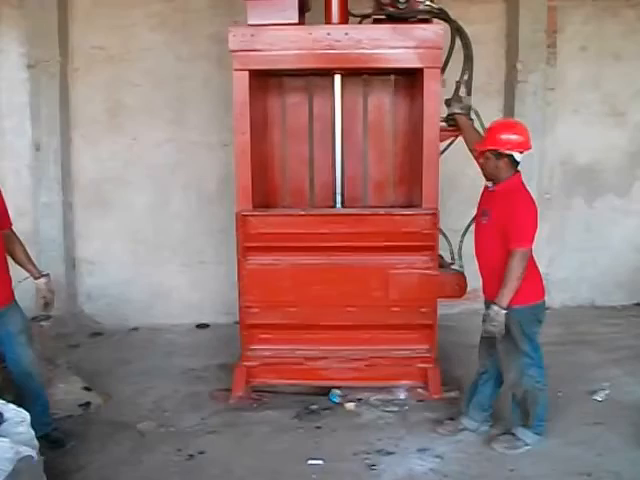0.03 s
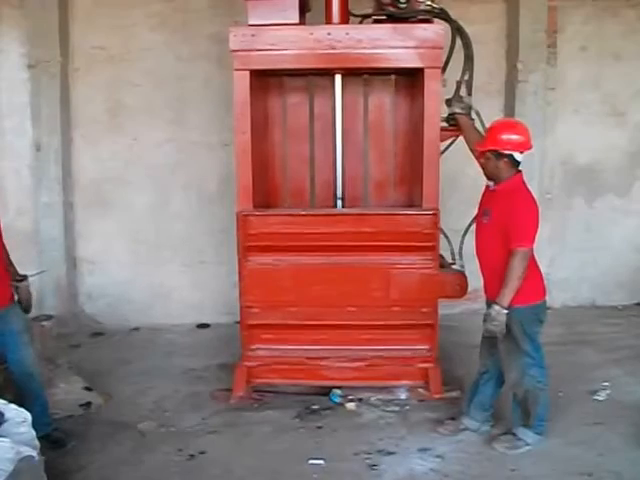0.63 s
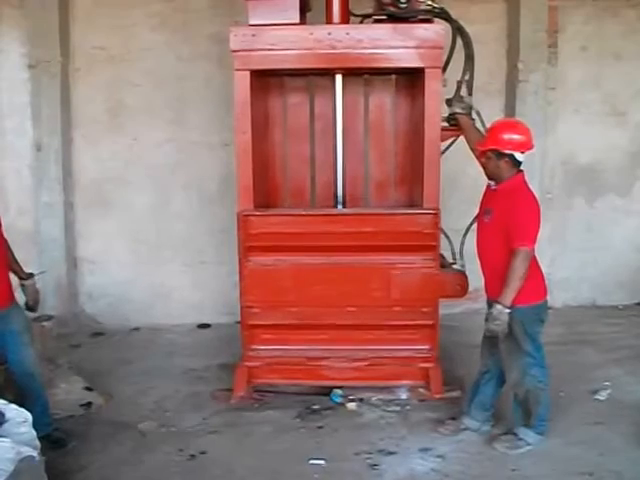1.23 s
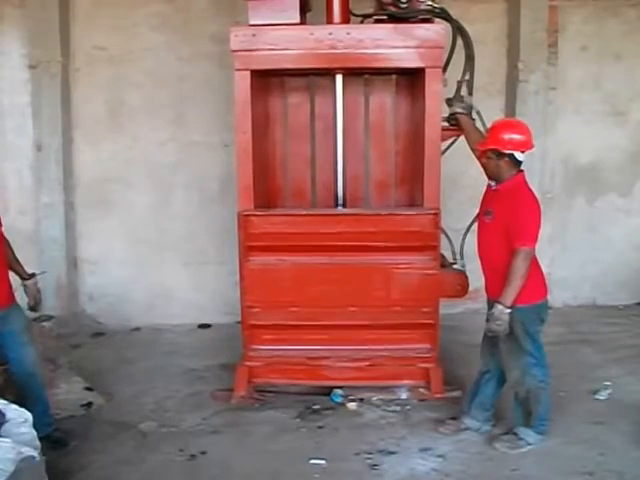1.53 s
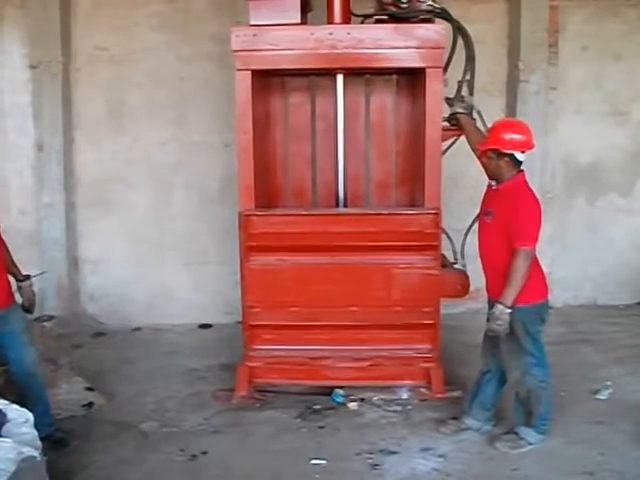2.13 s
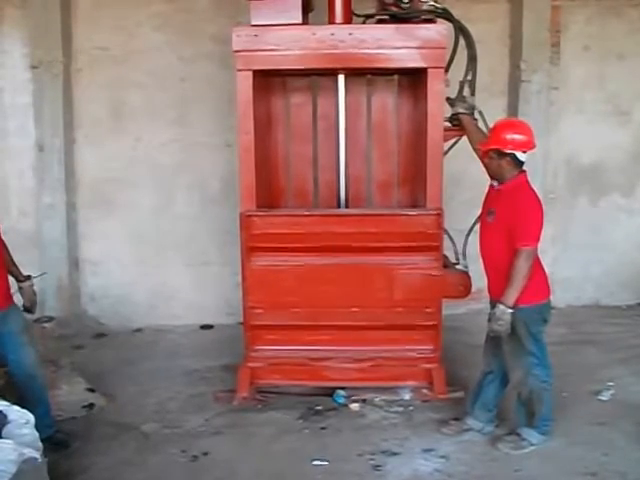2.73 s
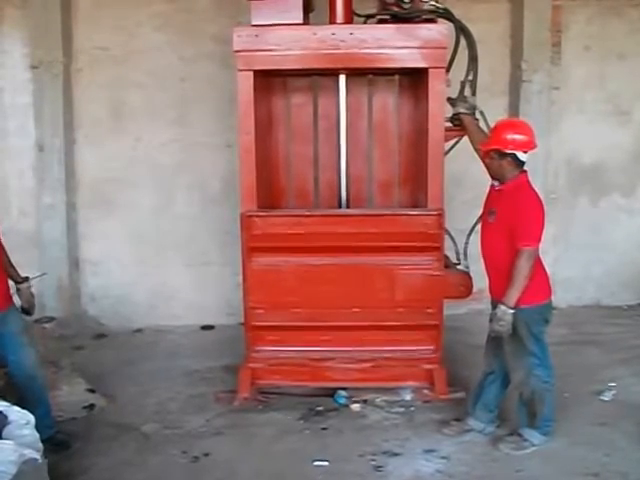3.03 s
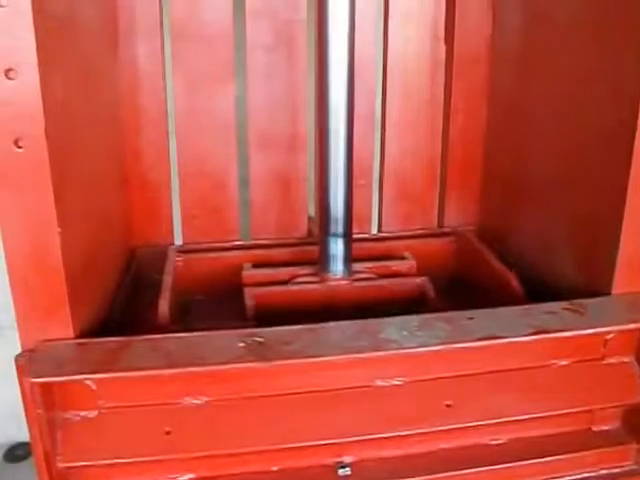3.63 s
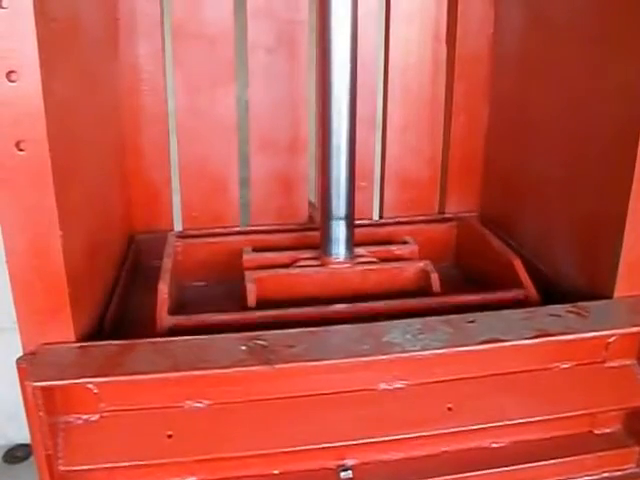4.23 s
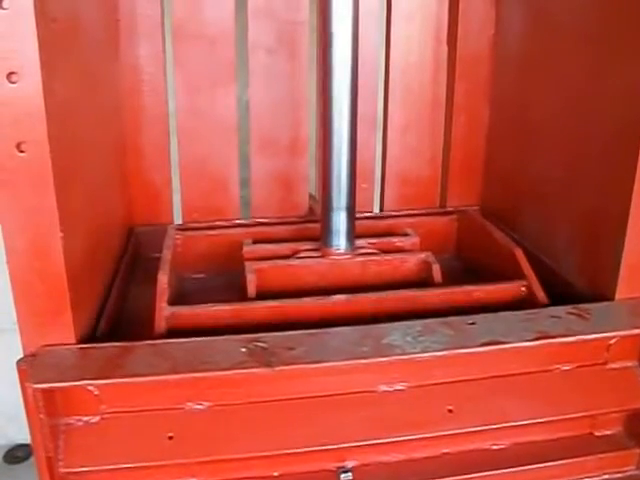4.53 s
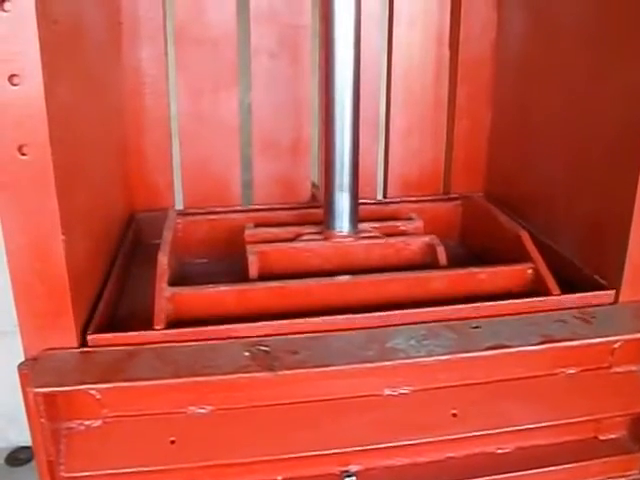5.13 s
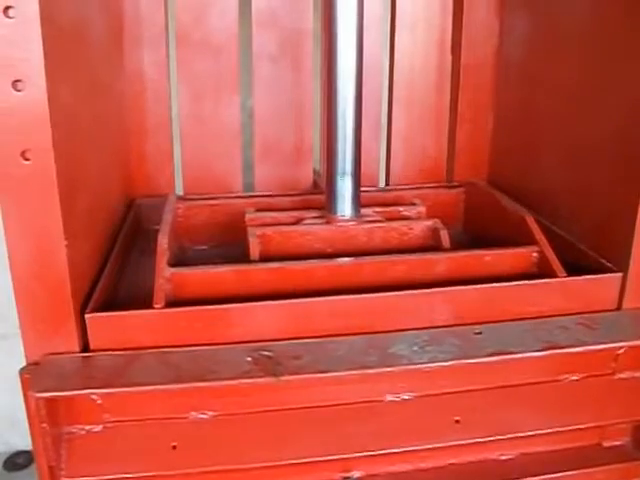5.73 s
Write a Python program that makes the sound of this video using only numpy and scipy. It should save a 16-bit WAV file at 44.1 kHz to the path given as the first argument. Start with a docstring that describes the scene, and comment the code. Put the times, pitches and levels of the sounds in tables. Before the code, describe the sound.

A hydraulic press runs throughout, its motor and oil pump humming and whining over a steady rush, first heard from across a bare concrete room. Oil hisses through a valve at the start and dies away at about 1 second. From 0.6 to 3.2 seconds, irregular steel knocks and clatters ring briefly with a short echo, mixed with a few tiny high rasps; the strongest knock comes near 2.9 seconds. At 3.5 seconds the sound jumps close to the mouth of the press, where the hum is fuller and louder. The sliding steel plate scrapes with a thin ringing rub until about 4.6 seconds. Near 4.8 seconds the ram gives two very short, loud, mid-pitched groans back to back, almost pure tones. From about 5.1 seconds the scraping eases and the rush dulls, while the pump hums on until the end, near 6 seconds.

```python
"""A hydraulic baling press in a bare concrete room

A motor turns a ten-vane oil pump, which hums and whines on multiples of its turning speed and slows
a little as the load grows. Oil hisses through a valve, and steel knocks and scrapes. We listen from
across the room, then jump to the mouth of the press. There the sinking ram, which drives the
pressing plate, sticks and slips and groans twice."""
import sys
import numpy as np
from scipy import signal
from scipy.fft import rfft, irfft
from scipy.io import wavfile

SR = 44100
rng = np.random.default_rng(int(sys.argv[2]) if len(sys.argv) > 2 else 0)


def store_pcm(level_fs):
    """Save levels as 16-bit WAV."""
    pcm = np.round(np.clip(level_fs, -1, 1) * 32767).astype(np.int16)
    wavfile.write(sys.argv[1], SR, np.atleast_2d(pcm).T)


N = 255339
T = np.arange(N) / SR
JUMP_S = 3.478  # when we move from far to near


def gain(db):
    """Turn decibels into a number to multiply by."""
    return 10 ** (np.asarray(db) / 20)


def normalize(x):
    """Scale a sound to an average (rms) level of 1."""
    return x / np.sqrt(np.mean(x ** 2))


def wander(rate_hz):
    """A random drift, roughly 1 either way, that turns about rate_hz times a second."""
    steps = rng.standard_normal(1024)
    return 1.65 * np.interp(T * rate_hz + rng.random(), np.arange(len(steps)), steps)


def swell(start_s, length_s):
    """Rise from 0 to 1 and fall back, as half a sine wave."""
    return np.maximum(np.sin(np.pi * np.clip((T - start_s) / length_s, 0, 1)), 0)


def band(x, low_hz, high_hz, order=2):
    """Keep the sound between two pitches."""
    edges = [low_hz, min(high_hz, SR / 2.2)]
    return signal.sosfilt(signal.butter(order, edges, "band", fs=SR, output="sos"), x)


def rush(spectrum, lift_db, flicker_db, treble_hz=1800):
    """Swirling noise in bands that flicker alone and together; lift_db raises the high ones."""
    freqs = np.fft.rfftfreq(N, 1 / SR) + 1e-3
    hz, db = np.transpose(spectrum)
    shape = gain(np.interp(np.log(freqs), np.log(hz), db))
    noise = rfft(rng.standard_normal(N)) * shape * np.sqrt(SR / 2)
    edges = np.r_[0, 100 * 2 ** np.arange(0, 7.5, .5)]  # half an octave apart
    out, together = 0, wander(21.97)
    for low, high in zip(edges, edges[1:]):
        treble = high ** 2 / (high ** 2 + treble_hz ** 2)
        level_db = treble * (lift_db + flicker_db * together) + flicker_db * wander(18)
        out += irfft(noise * ((freqs >= low) & (freqs < high)), N) * gain(level_db)
    return out


def motor_hum(level_db):
    """The motor's iron hums at twice the 60 Hz of its power supply."""
    return np.sqrt(2) * gain(level_db + wander(4)) * np.sin(2 * np.pi * 120 * T)


# Flow and fan noise from across the room: pitch_hz, level_db_per_hz
FAR_NOISE = [(25, -63.5), (60, -55.5), (120, -54.5), (200, -55.5), (350, -54), (600, -52), (800, -57),
             (1150, -55.5), (1600, -57), (2300, -60.5), (3200, -64.5), (4500, -69.5), (6500, -72),
             (8600, -80)]

def far_flow():
    """Flowing oil and the fan make a steady rush."""
    return rush(FAR_NOISE, lift_db=-0.5, flicker_db=1)


def plate_freed(middle_s=5.105, length_s=0.29):
    """Go from 0 while the pressing plate drags on its guides to 1 once it runs free."""
    return np.clip((T - middle_s) / length_s + .5, 0, 1)


# Flow and fan noise at the mouth: pitch_hz, level_db_per_hz
NEAR_NOISE = [(25, -64.5), (60, -52.5), (120, -57), (230, -49.5), (350, -50.5), (600, -54.5), (800, -55.5),
              (1150, -53), (1600, -62), (2300, -64), (3200, -68.5), (4500, -74), (6500, -76), (8600, -82.5)]
# Tight spots where the plate scrapes harder: start_s, length_s, extra_treble_db
TIGHT_SPOTS = [(3.88, 0.23, 2), (4.263, 0.28, 2.5), (4.91, 0.11, 3)]

def near_flow_and_scrape(drag_db=2.1, free_db=-5):
    """The dragging plate brightens the rush, which dulls once the plate runs free."""
    free = plate_freed()
    scrape_db = sum(db * swell(start, length) for start, length, db in TIGHT_SPOTS)
    lift_db = drag_db * (1 - free) + free_db * free + scrape_db
    return rush(NEAR_NOISE, lift_db, flicker_db=0.73)


# Oil squeezing through the hand valve: pitch_hz, level_db_per_hz
VALVE_NOISE = [(150, -62), (350, -53.5), (700, -53.5), (1500, -54.5), (2300, -60), (3200, -61), (4500, -62),
               (6500, -77), (8600, -96)]
# Ringing pipes and hoses: pitch_hz, relative_level_db
PIPE_NOTES = [(1200, -7), (1490, -2), (1630, -1), (1780, -7), (1900, 0.5), (2110, -0.5), (2800, -3),
              (2950, 1), (3220, -4), (3370, -1), (4170, -5), (4630, -13)]

def valve_hiss(open_s=0.845, fade_db_per_s=7, stop_db_per_s=98, ring_db=-24):
    """Oil hisses and rings the pipes: it surges, fades as the valve opens and dies once it is wide."""
    noise = rng.standard_normal(N)
    ring = sum(gain(db) * band(noise, hz - 15, hz + 15, order=1) for hz, db in PIPE_NOTES)
    hiss = rush(VALVE_NOISE, lift_db=0, flicker_db=0)
    surge_db = 0.5 + 3.5 * swell(0, length_s=0.35)
    fade_db = fade_db_per_s * T + stop_db_per_s * np.maximum(T - open_s, 0)
    return gain(surge_db - fade_db) * (hiss + gain(ring_db) * normalize(ring))


# Steel hitting the frame, before each part is turned down: start_s, body_db, clatter_db, tick_db
STEEL_HITS = [(.636, -14.5, -24, -34), (.699, -14, -19.5, -29.5), (1.385, -15, -27, -29.5),
              (1.612, -20.5, -19.5, -26), (1.74, -19.5, -19.5, -28.5), (1.858, -16.5, -23, -33),
              (2.034, -22, -39, -44), (2.406, -12.5, -36, -25), (2.556, -18, -19.5, -36),
              (2.694, -17.5, -24.5, -19.5), (2.778, -16, -19, -33), (2.892, -5, -22, -20.5),
              (3.032, -14.5, -29, -39), (3.145, -26, -28, -39), (3.183, -20, -31, -35),
              (3.219, -30, -25, -42)]
# The frame's ringing, which fades 60 dB in ring_s: pitch_hz, ring_s, relative_level_db
FRAME_NOTES = [(517, 0.055, 0.5), (806, 0.1, -3), (902, 0.13, -2.5), (1034, 0.24, -8), (1405, 0.19, -0.5),
               (1551, 0.11, 0), (1695, 0.11, -3.5), (1885, 0.063, 4.5), (2410, 0.087, -6)]

def knocks(contact_s=.014, rise_s=0.0021, echo_db=-13, echo_s=1.0):
    """Each knock is a spray of tiny hits that rings the frame and dies away between the walls."""
    t = T[:SR // 2]
    out = np.zeros(N + len(t))
    for start, body_db, clatter_db, tick_db in STEEL_HITS:
        fall = np.exp(-(t / (2 * contact_s)) ** 2) + gain(echo_db - 60 * t / echo_s)
        grit = rng.standard_normal(len(t)) * gain(1.5 * rng.standard_normal(len(t)))
        spray = grit * fall * (1 - np.exp(-t / rise_s))
        notes = 0
        for hz, ring_s, db in FRAME_NOTES:
            pitch_hz = hz * (1 + 0.011 * rng.standard_normal())
            notes += gain(db - 60 * t / ring_s) * np.sin(2 * np.pi * pitch_hz * t)
        ring = signal.fftconvolve(spray, notes)[:len(t)]
        body = normalize(band(spray, 590, 1790)) + gain(-2) * normalize(ring)
        clatter = band(spray, 1800, 3070)
        tick = band(spray, 5300, 7200)
        i = int(start * SR)
        for part, db in (body, body_db - 3), (clatter, clatter_db - 2), (tick, tick_db - 1):
            out[i:i + len(t)] += gain(db) * part / np.std(part[:SR // 40])  # level of the first 25 ms
    return out[:N]


# Rubbed steel, from short rasps to long tones: start_s, length_s, pitch_hz, width_hz, level_db
RUBS = [(1.204, .034, 4510, 220, -33), (1.61, 0.021, 2930, 220, -21), (1.691, .033, 3110, 200, -27),
        (1.806, 0.051, 3720, 350, -27), (2.305, 0.037, 4070, 450, -32), (2.559, 0.065, 3360, 300, -31),
        (3.47, 1.1, 1167, 130, -23.5), (4.2, .36, 579, 7.5, -22), (4.942, .046, 5220, 350, -41)]

def rubbing():
    """The sliding plate rubs the steel and makes it sing in narrow bands of noise."""
    out = np.zeros(N)
    for start, length, hz, width, db in RUBS:
        rasp = band(rng.standard_normal(N), hz - width / 2, hz + width / 2)
        out += gain(db) * swell(start, length) ** .5 * normalize(rasp)
    return out


# The ram's two groans: start_s, length_s, pitch_hz, level_db
RAM_GROANS = [(4.757, 0.052, 580, -8.5), (4.817, 0.062, 584.6, -4.5)]

def groans(wobble=0.0033):
    """The ram sticks and slips in time with one ringing note, so a nearly pure tone swells and stops."""
    out = np.zeros(N)
    for start, length, hz, db in RAM_GROANS:
        pitch_hz = hz * (1 + wobble * wander(170))
        tone = np.sin(2 * np.pi * np.cumsum(pitch_hz) / SR)
        out += np.sqrt(2) * gain(db) * swell(start, length) ** 0.62 * tone
    return out


VANES = 10

def pump(shaft_hz, steady, strong, waver_db, jitter_rad, scatter_rad, faint_db):
    """Each vane sends out a pulse; the off-centre rotor adds a throb once a turn, making side tones."""
    angle = 2 * np.pi * np.cumsum(shaft_hz) / SR + jitter_rad * wander(25)
    lags, throbs = 2 * np.pi * rng.random((2, 32))

    def tone(k, db):
        """A tone at k times the shaft speed, loosely in step with others near the same vane tone."""
        group = round(k / VANES)
        phase = round(k) * (angle + throbs[group]) + lags[group]
        return gain(db) * np.cos(phase + scatter_rad * rng.standard_normal())

    out = sum(tone(k, db + 0.4 * wander(7.1)) for k, db in strong.items())
    for k, db in steady:
        share = .5 if round(k) % VANES == 0 else 1  # vane tones waver less
        out += tone(k, db + waver_db * share * wander(5))
    # Unequal vanes faintly fill in the other multiples.
    others = set(range(2, 60)) - set(strong) - {round(k) for k, _ in steady}
    out += sum(tone(k, faint_db - abs(k - 25) / 6 + waver_db * wander(5.4)) for k in sorted(others))
    return np.sqrt(2) * out


# Steady pump tones across the room: shaft_multiple, level_db
FAR_STEADY_TONES = [(9, -40.5), (11, -36.5), (12, -35), (13, -47), (17, -46), (18, -38.5), (22, -34.5),
                    (29, -40.5), (31, -33.5), (32, -32.5), (34, -36), (35, -32), (40, -37.5), (50, -39),
                    (60, -36), (61, -46)]
# Strong tones that dip when the shaft has slowed by slowdown_hz:
# shaft_multiple, level_db, slowdown_hz, half_width_hz, dip_db
FAR_DIPPING_TONES = [(10, -20.5, .01, 0.077, 4.5), (19, -21.5, 0.47, 0.03, 25),
                     (20, -20.5, 0.042, 0.034, 7.5), (21, -22, 0.3, .13, 29.5), (30, -17.5, 0.2, 0.15, 20)]

def far_pump(shaft_hz=29.54):
    """The growing load slows the pump; each strong tone dips where the room's echoes cancel it."""
    slowdown_hz = .062 * T + .027 * T ** 2
    strong = {round(k): db - dip_db / (1 + ((slowdown_hz - dip_at_hz) / width) ** 2)
              for k, db, dip_at_hz, width, dip_db in FAR_DIPPING_TONES}
    return pump(shaft_hz - slowdown_hz, FAR_STEADY_TONES, strong,
                waver_db=1.0, jitter_rad=0.0032, scatter_rad=0.96, faint_db=-46.5)


# Steady pump tones at the mouth: shaft_multiple, level_db
NEAR_STEADY_TONES = [(12, -35.5), (13, -39.5), (14, -33), (15, -40), (16, -27.5), (18, -28), (22, -35.5),
                     (23, -37.5), (27, -35.5), (30, -34), (31, -29), (32, -38), (35, -37), (49, -34.5),
                     (50, -36.5), (59, -40.5), (61, -39.5), (62, -46), (119, -47), (120, -42), (140, -48)]
# Strong tones while the plate drags, and once it is free: shaft_multiple, level_db, change_when_free_db
NEAR_STRONG_TONES = [(5, -23.5, -3.5), (10, -8.5, 0.7), (19, -28.5, 5.5), (20, -24, 0), (21, -22.5, -3),
                     (29, -23, -1.5), (40, -25, -6), (60, -28.5, -2.5)]

def near_pump(shaft_hz=29.505, whine_db=-45, fall_db_per_octave=9.5):
    """At a steady speed, the steel chamber booms with the vane pulses and whines on their overtones."""
    free = plate_freed()
    held_back_db = 2.5 * np.exp(-np.maximum(T - JUMP_S, 0) / 0.38)  # tones build up after the jump
    strong = {round(k): db + change * free - held_back_db for k, db, change in NEAR_STRONG_TONES}
    whine = {k: whine_db - fall_db_per_octave * np.log2(k / 70) for k in range(70, 290, VANES)}
    steady = {**whine, **{round(k): db for k, db in NEAR_STEADY_TONES}}
    return pump(np.full(N, shaft_hz), steady.items(), strong,
                waver_db=1.5, jitter_rad=0.0016, scatter_rad=1.96, faint_db=-47.5)


def scene():
    """Across the room, then at the mouth; the left side hears it all a moment after the right."""
    far = far_pump() + motor_hum(level_db=-37) + valve_hiss() + far_flow() + knocks()
    near = near_pump() + motor_hum(level_db=-30) + near_flow_and_scrape()
    jump = np.clip((T - JUMP_S) / .006, 0, 1)
    right = (1 - jump) * far + jump * near + rubbing() + groans()
    left = np.r_[0, 0, right[:-2]]
    return np.array([left, right])


def record(dry):
    """Flatten the loudest peaks and cut the treble above 9000 Hz."""
    treble_cut = signal.ellip(8, .2, 70, 9000, fs=SR, output="sos")
    return signal.sosfilt(treble_cut, np.clip(dry, -1, 1))


dry = scene()
out = record(dry)
store_pcm(out)
```